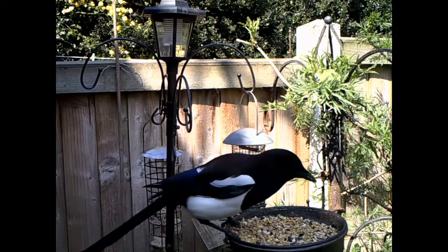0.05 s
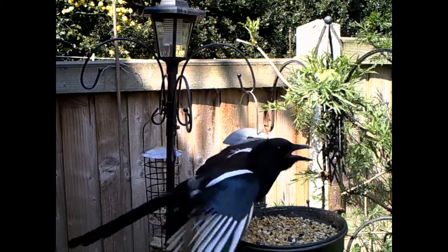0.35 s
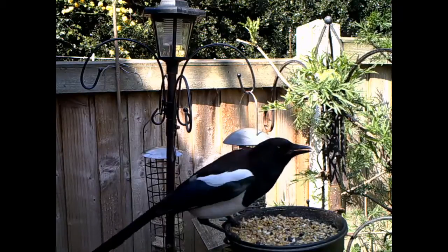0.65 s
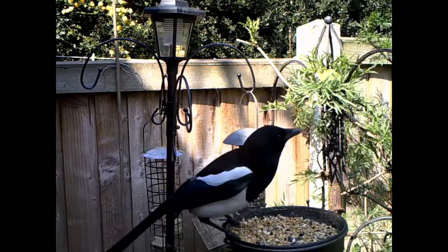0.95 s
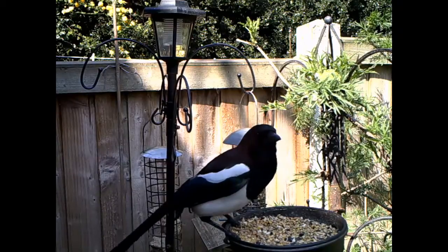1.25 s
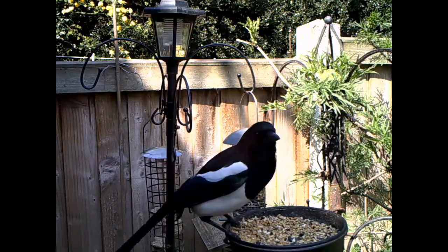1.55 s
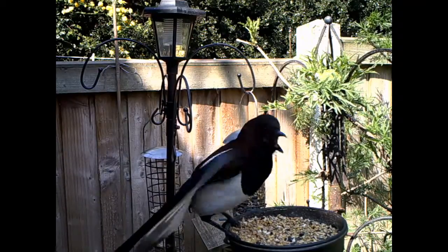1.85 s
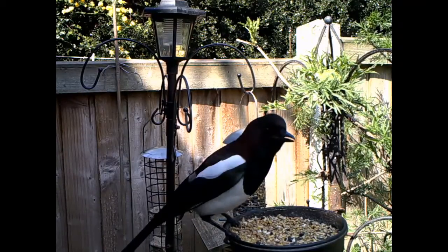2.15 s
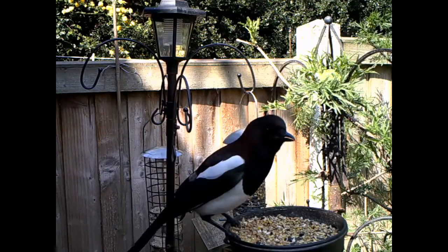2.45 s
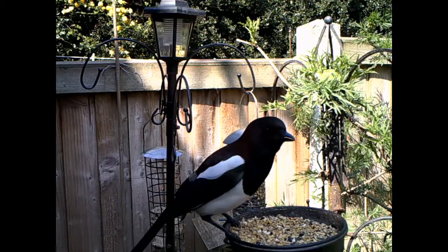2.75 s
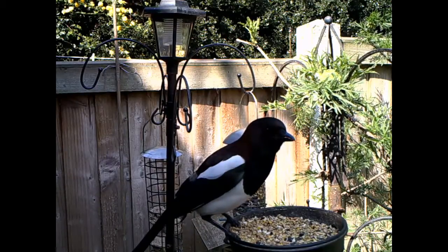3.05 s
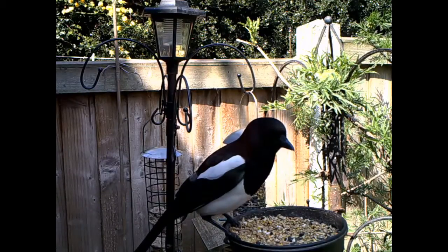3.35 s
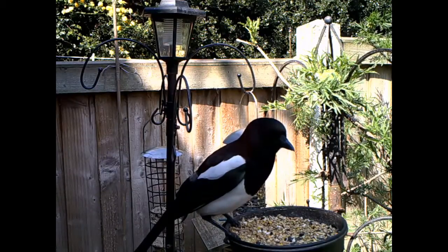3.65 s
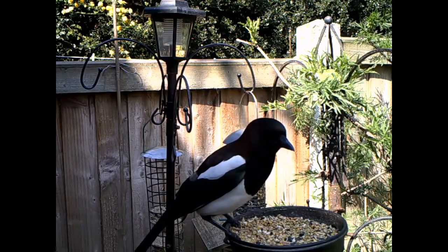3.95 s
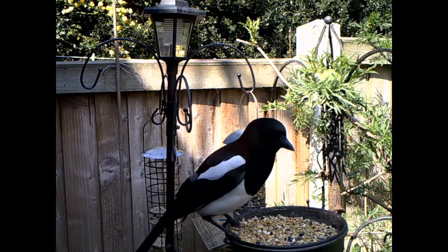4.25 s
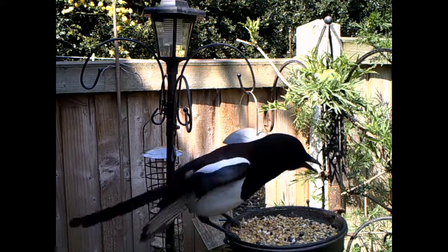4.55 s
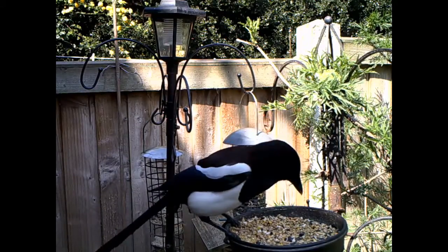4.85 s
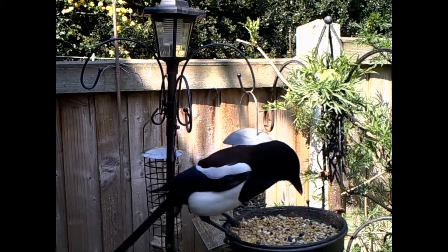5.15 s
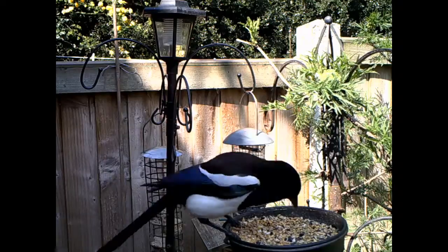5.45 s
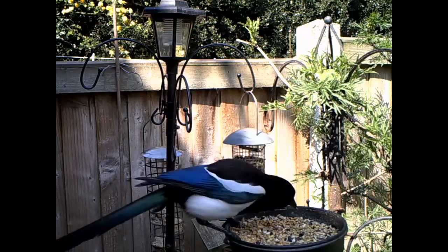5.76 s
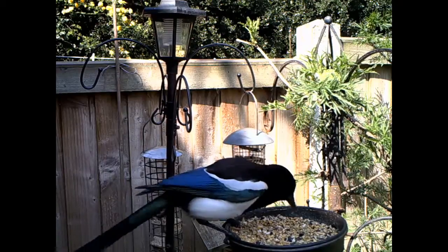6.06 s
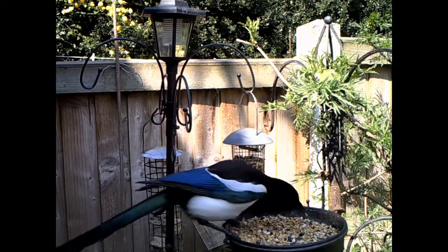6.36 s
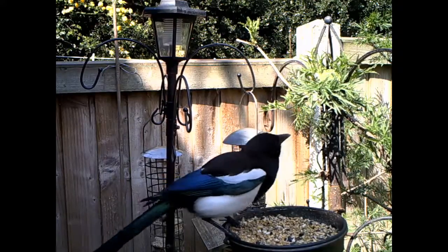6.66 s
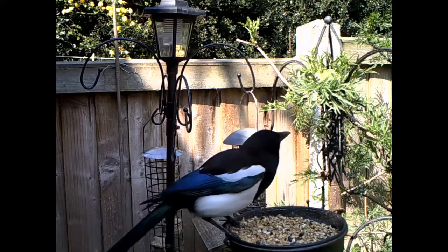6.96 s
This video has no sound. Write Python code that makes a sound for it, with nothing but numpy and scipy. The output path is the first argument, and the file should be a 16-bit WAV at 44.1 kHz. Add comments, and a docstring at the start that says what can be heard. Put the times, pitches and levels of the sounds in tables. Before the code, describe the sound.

A magpie close to the microphone gives three short, harsh calls in a garden, with pauses of about two seconds between them. Each is a shrill, two-toned squawk that breaks into a dry rasp, with a slight echo off a wooden fence. Distant songbirds whistle faintly, and a soft, far churr follows the last call. Quiet outdoor hiss and low rumble continue throughout.

```python
"""Magpie in a garden

A magpie on a feeder gives three short, harsh calls close by. The two sides of its syrinx sound two
pitches at once and modulate each other, producing combination tones. Each call ends as both sides
go slack and collapse into a rasp of irregular pulses that ring the throat and beak.
A wooden fence echoes the calls; far birds sing over quiet outdoor air."""
import sys
import numpy as np
from scipy import signal
from scipy.fft import rfft, irfft, next_fast_len
from scipy.io import wavfile

SR = 44100
rng = np.random.default_rng(int(sys.argv[2]) if len(sys.argv) > 2 else 0)


def master(y):
    """Save y as 16-bit WAV."""
    cut = np.clip(np.atleast_2d(y).T, -1, 1)
    pcm = np.round(cut * 32767)  # scale
    wavfile.write(sys.argv[1], SR, pcm.astype(np.int16))


N = 309582
TIME = np.arange(N) / SR

# Spectrum of the outdoor air: frequency_hz, relative_density_db
AIR_SPECTRUM = [(8.8, -27.5), (15, -3), (19, -3), (22, -14.5), (27, -15), (48, -10.5), (66, -18.5),
                (118, -20.5), (355, -24.5), (693, -26.5), (1200, -30), (3960, -35), (8180, -44),
                (10000, -49.5), (15500, -66.5)]
# Whistles of far songbirds: start_s, length_s, start_hz, end_hz, relative_level_db
SONG_NOTES = [(0.665, .06, 2750, 3110, -61), (1.138, .09, 4300, 3900, -63), (1.349, 0.068, 4040, 3860, -62),
              (1.52, 0.088, 4080, 3820, -63), (1.579, 0.038, 2360, 2570, -58.5),
              (2.599, 0.057, 2880, 2650, -61), (5.615, 0.15, 3480, 3150, -60.5),
              (5.813, 0.081, 2930, 2830, -62), (6.017, 0.127, 3360, 3550, -64.5),
              (6.255, 0.157, 2880, 3000, -61.5), (6.33, 0.064, 4340, 4020, -64),
              (6.512, 0.089, 4230, 3980, -66), (6.706, 0.11, 4200, 3830, -64)]
# Reflections from fence and feeder: delay_s, level_db (relative to the diffuse scatter)
ECHOES = [(.0034, -6), (0.0136, -4), (.021, -3.5)]
# Resonances of the throat and open beak: centre_hz, nominal_width_hz, gain_db
FORMANTS = [(1230, 545, 2), (1520, 172, 7.5), (2260, 330, -1), (2920, 143, 6.5), (3340, 350, -39),
            (6500, 710, -21.5)]
# The rasp that ends each call: start_s, length_s, level_db
RASPS = [(.339, .072, -32), (1.98, .038, -24), (4.54, .043, -30.5)]
# The hardest snaps of the syrinx within the rasps: time_s, peak_db
SNAPS = [(.3427, -20), (1.9868, -12.5), (1.9926, -17.5), (4.5473, -23)]
# Overtones and combination tones of the two voices: low_multiple, high_multiple
PARTIALS = [(2, 0), (3, 0), (4, 0), (0, 2), (1, 1), (-1, 2), (2, 1)]
# Strength of each partial in turn, relative to its parent voices: level_db
PARTIAL_LEVELS = [-3.5, -21.5, -32.5, -29, -29.5, -24.5, -38]
# Motion of each voice in a call: attack_s, settle_s, sag_fraction_per_s, drop_fraction, slack_db
LOW_MOTION = (.021, .026, .61, .45, -9)
HIGH_MOTION = (.0034, .032, .12, .41, -13)
# The magpie's calls: start_s, length_s, collapse_s, collapse_span_s, low_hz, low_sharp_fraction,
# high_hz, high_sharp_fraction, low_db, high_db, accent_db, swell_db_per_s, low_lead_s,
# partial_boost_db, partial_flutter_db
CALLS = [(.2065, .148, .341, .0036, 1582, .135, 2534, .054, -31, -24.3, -2, 4, .002, 1.2, 2),
         (1.865, .122, 1.995, .0055, 1720, .07, 2515, .04, -32, -30, 3.7, 55, .019, -.8, 7),
         (4.4432, .118, 4.539, .0058, 1822, -.04, 2512, .07, -35.5, -31.7, 6.3, 8, .007, -.3, 5.5)]


def undb(db):
    """Amplitude ratio of a level in decibels."""
    return 10 ** (np.asarray(db) / 20)


def unit(x):
    """Normalisation to a standard deviation of 1."""
    return x / (np.std(x) + 1e-12)


def wander(rate_hz):
    """Low-passed noise: a smooth random fluctuation of unit spread."""
    return unit(signal.sosfilt(signal.butter(2, rate_hz, fs=SR, output="sos"), rng.standard_normal(N)))


def band(x, lo_hz, hi_hz, order=2):
    """Band-pass filtering between two edge frequencies."""
    return signal.sosfilt(signal.butter(order, [lo_hz, hi_hz], "band", fs=SR, output="sos"), x)


def gate(age, length_s, attack_s, release_s):
    """Trapezoidal envelope: linear rise, hold and linear fall."""
    return np.clip(age / attack_s, 0, 1) * np.clip((length_s - age) / release_s, 0, 1)


def reverberate(x, t60_s, build_s=.012):
    """Diffuse reverberation: convolution with a noise tail that builds up and decays exponentially."""
    t = TIME[:SR]
    tail = rng.standard_normal(SR) * np.exp(-np.log(1000) * t / t60_s) * np.clip(t / build_s, 0, 1)
    return signal.fftconvolve(x, tail / np.linalg.norm(tail))[:N]


def outdoor_air(level_db=-52.5, swell_db=.21):
    """Spectrally shaped noise: a low rumble under a smooth hiss, barely swelling."""
    hz, db = np.transpose(AIR_SPECTRUM)
    bin_hz = np.arange(N // 2 + 1) * SR / N
    colour = undb(np.interp(np.log(bin_hz + 1), np.log(hz), db))
    noise = unit(irfft(rfft(rng.standard_normal(N)) * colour, N))
    return undb(level_db) * noise * undb(swell_db * wander(2.6))


def far_whistles(direct_db=-2, scatter_db=-2.5, warble=.022):
    """Frequency modulation: thin, warbling glides, blurred by scattering from trees and houses."""
    song, waver = np.zeros(N), 1 + warble * wander(86)
    for start_s, length_s, start_hz, end_hz, db in SONG_NOTES:
        on = (TIME > start_s) & (TIME < start_s + length_s)
        progress = (TIME[on] - start_s) / length_s
        pitch_hz = (start_hz + (end_hz - start_hz) * progress) * waver[on]
        song[on] += undb(db) * np.sin(np.pi * progress) * np.sin(2 * np.pi * np.cumsum(pitch_hz) / SR)
    return undb(direct_db) * song + undb(scatter_db) * reverberate(song, t60_s=.41)


def far_churr(start_s=4.58, level_db=-56, fade_db_per_s=13, flutter_db=1.0):
    """Amplitude modulation of narrow-band noise: a far bird's dry churr, slowly fading."""
    churr = unit(band(rng.standard_normal(N), 2050, 2850, order=4) * undb(flutter_db * wander(37)))
    age = TIME - start_s
    envelope = gate(age, length_s=.71, attack_s=.14, release_s=.04)
    return churr * undb(level_db - fade_db_per_s * age) * envelope


def garden(x, scatter_db):
    """Reflection: close echoes and a short scatter from fence and shrubs follow the direct sound."""
    dull = band(x, 600, 4000, order=1)
    echoes = sum(undb(db) * np.interp(TIME - delay_s, TIME, dull, left=0) for delay_s, db in ECHOES)
    return x + undb(scatter_db) * (echoes + reverberate(dull, t60_s=.25))


def throat(x, absorption_hz=9000):
    """Resonance: throat and beak impose formants, and soft tissue absorbs the highest treble."""
    rung = 0
    for hz, width_hz, db in FORMANTS:
        stage = signal.iirpeak(hz, hz / (1.94 * width_hz), fs=SR)
        rung += undb(db) * signal.lfilter(*stage, signal.lfilter(*stage, x))  # twice, for steep sides
    return signal.sosfilt(signal.butter(1, absorption_hz, fs=SR, output="sos"), rung)


def rasp_envelope(hold_s=.016, fall_db_per_s=560, creak_db=-13):
    """Exponential decay: each rasp holds briefly, then falls to a weak creak until it stops."""
    envelope = np.zeros(N)
    for start_s, length_s, db in RASPS:
        age = TIME - start_s
        fall_db = np.maximum(-fall_db_per_s * np.maximum(age - hold_s, 0), creak_db)
        envelope += undb(db + fall_db) * gate(age, length_s, attack_s=.005, release_s=.004)
    return envelope


def rasp(rate_hz=750, jitter=.35, spread_db=3, hiss_db=-14, sheen_db=-34, bass_hz=1000, bass_max_db=-33):
    """Source and filter: the slack membranes slap at uneven intervals and ring the throat."""
    gap_draw, size_draw = rng.standard_normal((N // 20, 2)).T
    at = (np.cumsum(np.exp(jitter * gap_draw)) * SR / rate_hz).astype(int)
    slaps = np.bincount(at[at < N], undb(spread_db * size_draw[at < N]), N)
    source = unit(slaps) + undb(hiss_db) * rng.standard_normal(N)
    sheen = undb(sheen_db) * unit(band(source, 6000, 12000))  # the slaps' treble escapes past the beak
    rung, envelope = unit(throat(source)), rasp_envelope()
    bass = signal.sosfiltfilt(signal.butter(3, bass_hz, fs=SR, output="sos"), rung)
    # however hard the rasp, its bass grows only up to a limit
    return (rung - bass + sheen) * envelope + bass * np.minimum(envelope, undb(bass_max_db))


def snaps():
    """Impulse response: each of the hardest slaps rings the throat as a single click."""
    impulses = np.zeros(N)
    for time_s, peak_db in SNAPS:
        impulses[int(time_s * SR)] = undb(peak_db)
    return throat(impulses) / np.abs(throat(signal.unit_impulse(SR // 20))).max()


def membrane(age, slack, hz, sharp, accent_db, attack_s, settle_s, sag_per_s, drop, slack_db):
    """Tension governs pitch: a voice opens off pitch, settles, sags, then drops and weakens when slack."""
    held = np.maximum(age, 0)
    opening = np.exp(-(held / settle_s) ** 2)
    pitch_hz = hz * (1 + sharp * opening) * (1 - sag_per_s * held) * (1 - drop * slack)
    onset = (1 - np.exp(-held / attack_s)) ** 1.5
    return pitch_hz, onset * undb(accent_db * opening + slack_db * slack)


def syrinx(low_jitter=.0085, high_jitter=.0033, wobble=.0045, slack_jitter=.035,
           shimmer_db=.7, heave_db=.8, hiss_db=-34, sheen_db=-47,
           scoop_per_s=11, solo_db=-4, join_s=.01, release_s=.009):
    """Nonlinear coupling: two membranes make overtones and combination tones over turbulent hiss."""
    low_shake = 1 + low_jitter * wander(230) + wobble * wander(35)
    high_shake = 1 + high_jitter * wander(240)
    low_flutter = undb(shimmer_db * wander(180) + heave_db * wander(35))
    high_flutter = undb(shimmer_db * wander(150))
    # uneven contact makes the partials flutter more than the voices themselves
    contacts = [np.minimum(wander(130), .3) for _ in PARTIALS]
    # slack membranes lose their grip on the pitch
    low_slip, high_slip = slack_jitter * wander(400), slack_jitter * wander(400)
    turbulence = undb(hiss_db) * unit(band(rng.standard_normal(N), 2600, 4800))
    turbulence += undb(sheen_db) * unit(band(rng.standard_normal(N), 8300, 13000))  # at the beak's edge
    out = np.zeros(N)
    for (start_s, length_s, collapse_s, span_s, low_hz, low_sharp, high_hz, high_sharp,
         low_db, high_db, accent_db, swell_db_per_s, lead_s, boost_db, flutter_db) in CALLS:
        on = (TIME > start_s - lead_s) & (TIME < start_s + length_s)
        age = TIME[on] - start_s
        slack = .5 + .5 * np.tanh((TIME[on] - collapse_s) / (2 * span_s))
        effort = undb(swell_db_per_s * age) * np.clip((length_s - age) / release_s, 0, 1)
        low_pitch, low_gain = membrane(age + lead_s, slack, low_hz, low_sharp, 0, *LOW_MOTION)
        high_pitch, high_gain = membrane(age, slack, high_hz, high_sharp, accent_db, *HIGH_MOTION)
        # until the high voice joins, the low voice scoops upward and stays soft
        low_pitch *= 1 + scoop_per_s * np.minimum(age, 0)
        alone = 1 - np.clip(age / join_s, 0, 1)
        low_gain *= effort * undb(low_db + solo_db * alone) * low_flutter[on]
        high_gain *= effort * undb(high_db) * high_flutter[on]
        low_phase = 2 * np.pi * np.cumsum(low_pitch * (low_shake[on] + slack * low_slip[on])) / SR
        high_phase = 2 * np.pi * np.cumsum(high_pitch * (high_shake[on] + slack * high_slip[on])) / SR
        tone = low_gain * np.sin(low_phase) + high_gain * np.sin(high_phase)
        for (m, n), db, contact in zip(PARTIALS, PARTIAL_LEVELS, contacts):
            # a combination tone takes its strength from both parents
            low_share = abs(m) / (abs(m) + n)
            parents = low_gain ** low_share * high_gain ** (1 - low_share)
            gain = parents * undb(db + boost_db + flutter_db * contact[on])
            tone += gain * np.sin(m * low_phase + n * high_phase)
        out[on] = np.sqrt(2) * tone + (low_gain + high_gain) * turbulence[on]
    return out


def scene():
    """Superposition; by directivity, the low rasp spreads wider than the voices and stirs more echo."""
    voices = garden(syrinx(), scatter_db=-21)
    rasps = garden(rasp() + snaps(), scatter_db=-14.5)
    return (voices + rasps + far_whistles() + far_churr() + outdoor_air())[None]


def record(dry, shift_hz=6800, shift_db=-33.5, mirror_hz=17950, mirror_db=-55,
           top_hz=15650, offset=.0053):
    """Heterodyning adds faint shifted and mirrored treble copies; a low-pass and a DC offset follow."""
    analytic = signal.hilbert(band(dry, 1700, 6000), next_fast_len(N))[:, :N]
    shifted = undb(shift_db) * np.real(analytic * np.exp(2j * np.pi * shift_hz * TIME))
    mirrored = undb(mirror_db) * np.real(analytic * np.exp(-2j * np.pi * mirror_hz * TIME))
    copies = band(shifted + mirrored, 9000, 19000, order=4)
    return signal.sosfilt(signal.ellip(8, .2, 70, top_hz, fs=SR, output="sos"), dry + copies) + offset


dry = scene()
out = record(dry)
master(out)
```